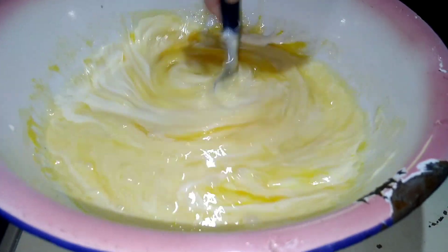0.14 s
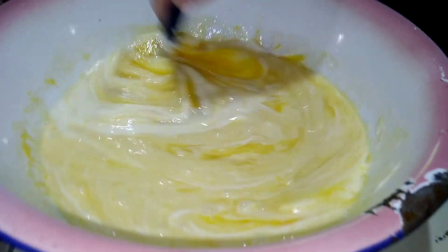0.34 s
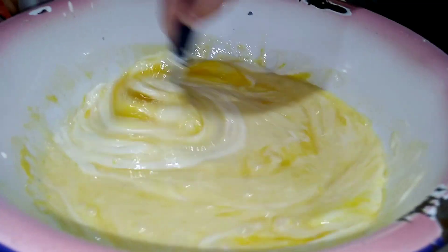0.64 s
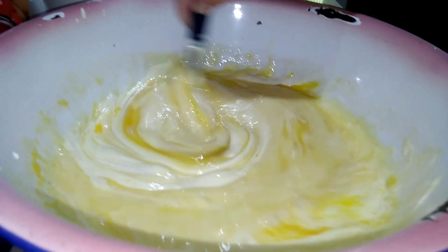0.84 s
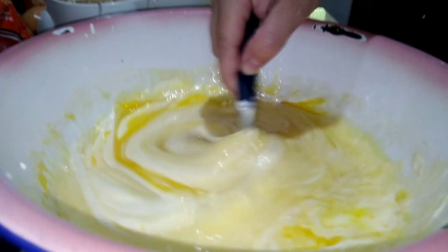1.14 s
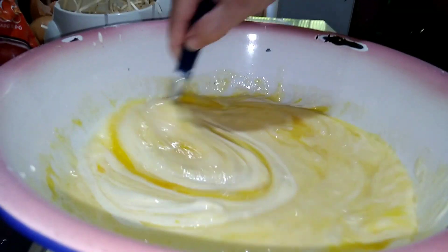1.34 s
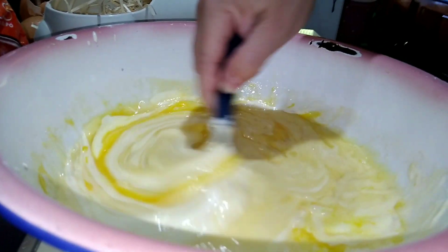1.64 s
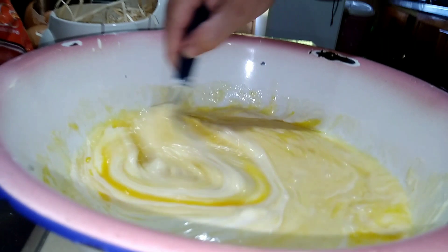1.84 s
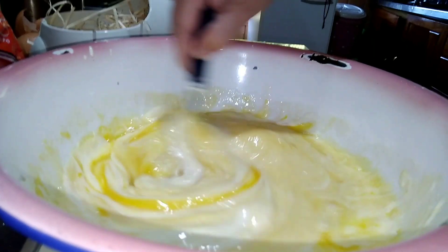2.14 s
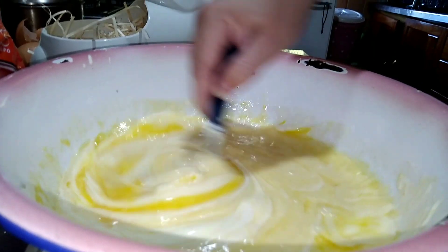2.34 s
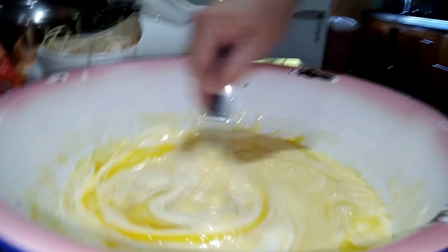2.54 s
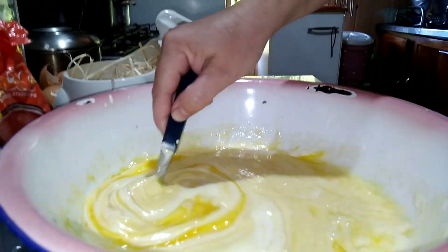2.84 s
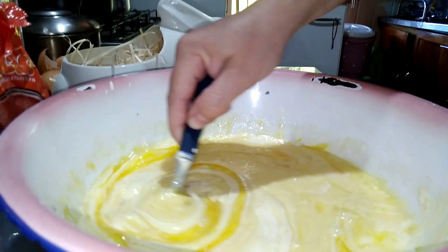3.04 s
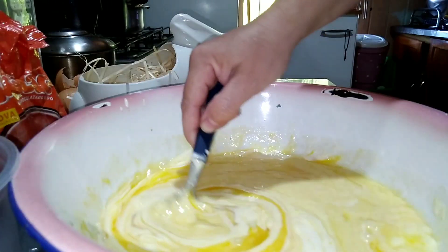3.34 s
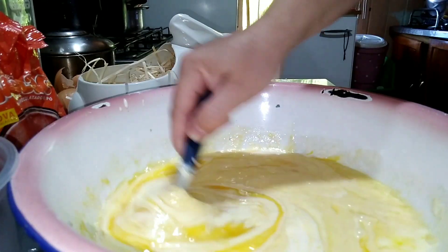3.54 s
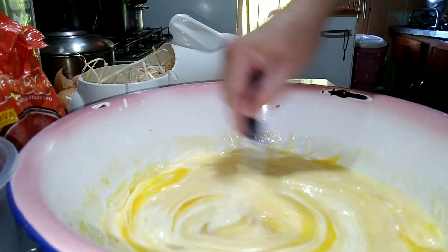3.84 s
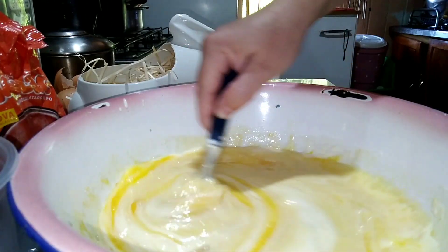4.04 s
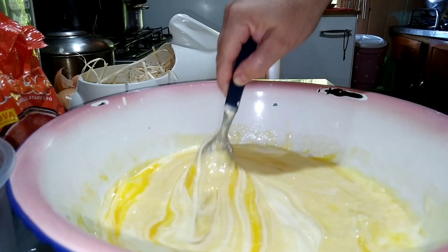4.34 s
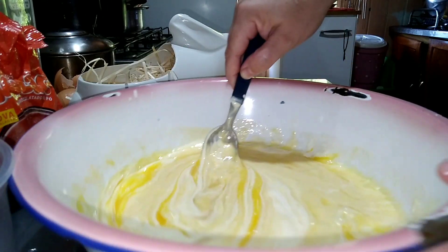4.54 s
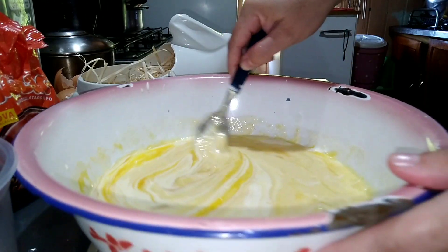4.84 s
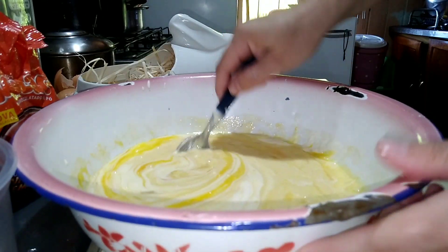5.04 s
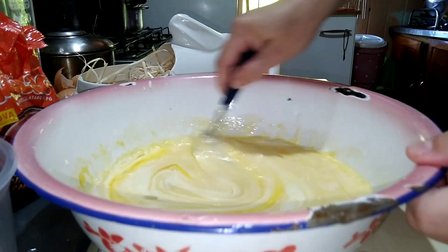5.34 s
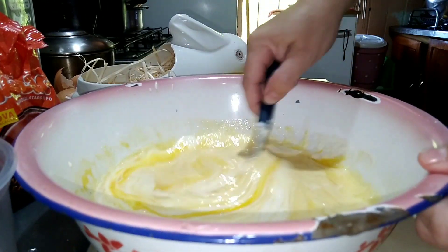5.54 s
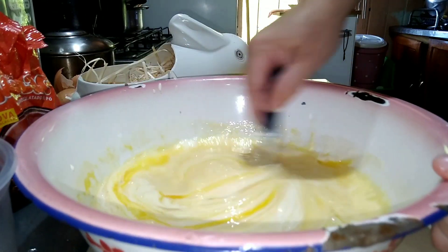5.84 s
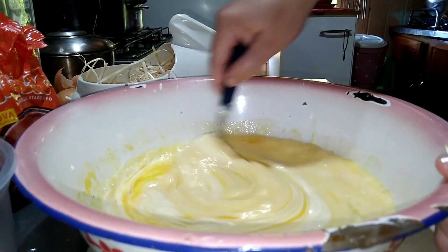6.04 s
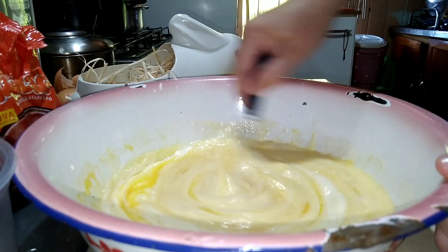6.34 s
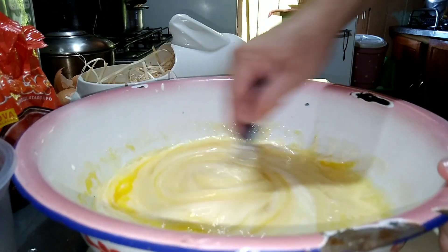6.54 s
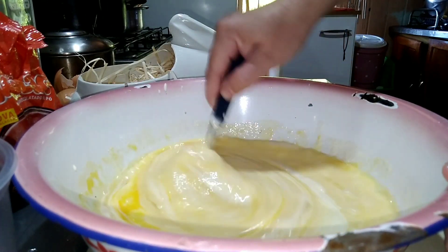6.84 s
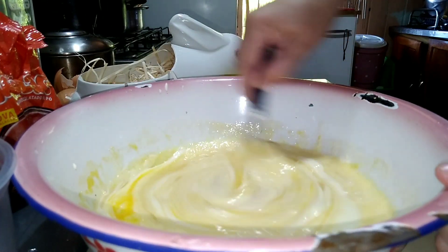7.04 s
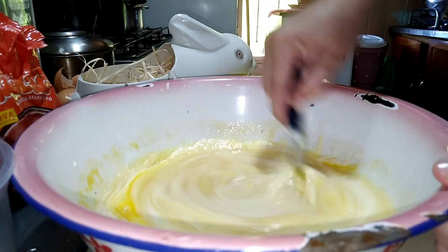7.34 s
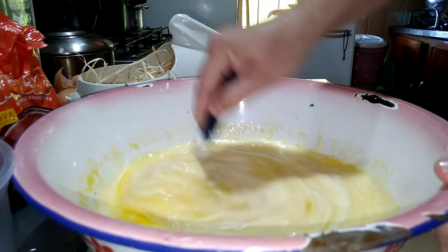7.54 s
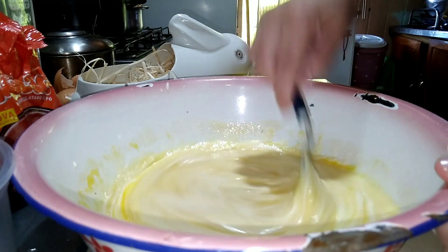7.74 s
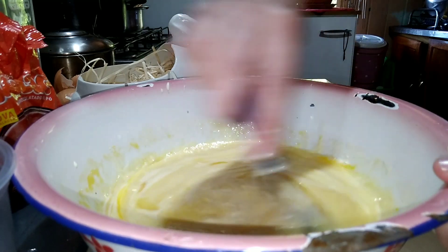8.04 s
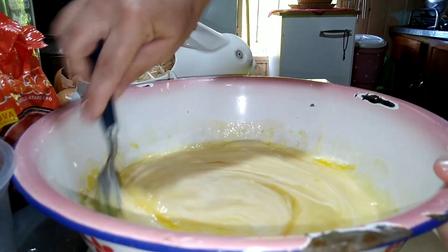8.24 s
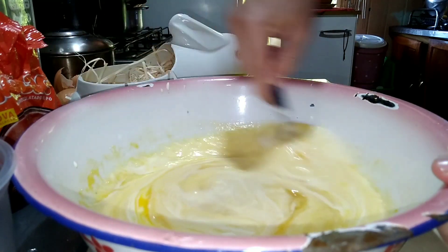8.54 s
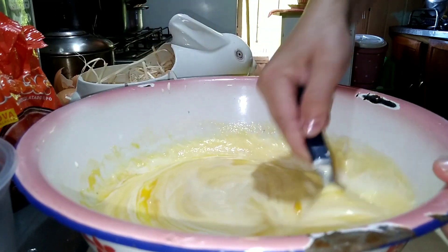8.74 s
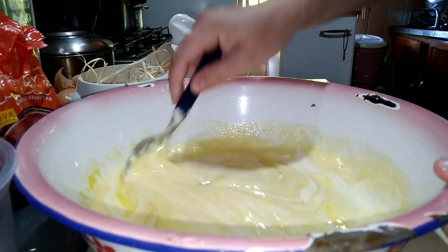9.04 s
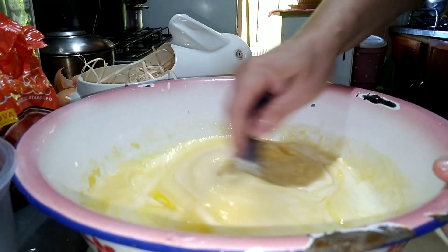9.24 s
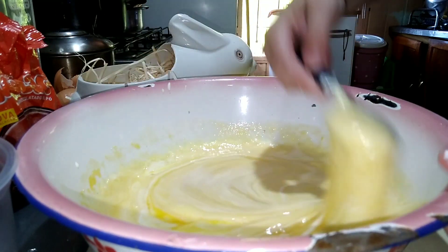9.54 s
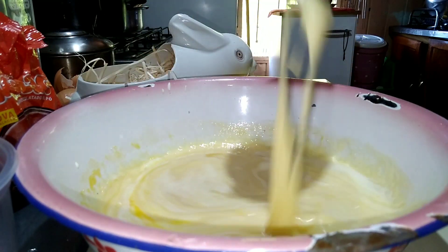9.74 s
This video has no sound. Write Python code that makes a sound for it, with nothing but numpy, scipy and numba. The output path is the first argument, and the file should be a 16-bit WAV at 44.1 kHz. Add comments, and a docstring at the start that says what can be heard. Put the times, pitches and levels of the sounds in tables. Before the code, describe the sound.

A metal spoon stirs thick wet batter in an enamel basin, scraping, squelching and knocking dully, over a low kitchen hum.

```python
"""A brief wet scrape comes first, then a spoon stirs thick batter in an enamel basin, heard by two microphones.
Each stroke drags wet grit over the enamel, built from tiny random slips, and pops small air pockets, built from
short notes. Knocks ring the batter-damped wall and boom the bottom, as fading sine waves and noise; early on,
firm blows on the bottom also rock the basin. Filtered noise makes the quiet kitchen: a low rumble and the hum
of an appliance."""
import sys
import numpy as np
from scipy import signal
from scipy.fft import rfft, irfft
from scipy.io import wavfile
from scipy.ndimage import uniform_filter1d
from numba import njit

SR = 44100
rng = np.random.default_rng(int(sys.argv[2]) if len(sys.argv) > 2 else 0)


def log_audio(samples):
    """Write samples as a 16-bit WAV file to the path given in sys.argv[1]."""
    # one column per channel
    frames = np.atleast_2d(samples).T
    # limit to full scale, then quantise
    limited = np.clip(frames, -1, 1)
    pcm = np.round(limited * 32767).astype(np.int16)
    wavfile.write(sys.argv[1], SR, pcm)


N = 435708
TIME = np.arange(N) / SR
OPPOSITE = np.array([[1], [-1]])  # added to the left, taken from the right


def undb(db):
    """Turn decibels into a gain."""
    return 10 ** (np.asarray(db) / 20)


def unit(x):
    """Scale to an average (rms) level of 1."""
    return x / np.sqrt(np.mean(x ** 2))


def early_level(x, count):
    """The rms level of the first samples of a sound."""
    return np.sqrt(np.mean(x[:, :count] ** 2))


def curve(rows):
    """Gain at every sample, drawn through rows of seconds and dB."""
    return undb(np.interp(TIME, *np.transpose(rows)))


def convolve(x, response):
    """Let x set off a response at every sample, keeping the length of x."""
    return signal.fftconvolve(np.atleast_2d(x), np.atleast_2d(response), axes=-1)[:, :x.shape[-1]]


def colour(x, points, size=4096):
    """Shape the tone through points of Hz and dB, without any sound before its cause."""
    hz, db = np.transpose(points)
    grid = np.linspace(1, SR / 2, size // 2 + 1)
    log_gain = np.log(undb(np.interp(np.log(grid), np.log(hz), db)))
    cepstrum = irfft(log_gain)
    # folding the cepstrum makes the filter respond as early as it can
    fold = 1 + np.sign(size // 2 - np.arange(size))
    fold[0] = 1
    return convolve(x, irfft(np.exp(rfft(cepstrum * fold))))


def band(x, lo_hz, hi_hz, order=2):
    """Keep the range between two frequencies."""
    edges = [lo_hz, min(hi_hz, SR / 2 - 1)]
    return signal.sosfilt(signal.butter(order, edges, "band", fs=SR, output="sos"), x)


def walk(rate):
    """Smooth random wander with a spread near 1, taking this many new values a second."""
    k = int(SR / rate)
    steps = np.repeat(rng.standard_normal(N // k + 1), k)
    return unit(uniform_filter1d(steps, k)[:N])


def fade(t, t60):
    """Exponential decay, 60 dB down after t60 seconds."""
    return np.exp(-np.log(1000) * t / t60)


def add(out, at, sound):
    """Mix a sound in at a time in seconds."""
    i = int(at * SR)
    out[:, i:i + sound.shape[-1]] += sound[..., :N - i]


def pair(count, apart_hz=700):
    """Noise as two close microphones hear it: alike in the bass, unrelated in the treble."""
    mid, side = rng.standard_normal((2, count))
    return mid + band(side, apart_hz, SR / 2, order=1) * OPPOSITE


@njit
def resonate(x, hz, damping):
    """Band-pass like a hollow whose pitch may move at every sample."""
    y, b, l = np.empty(len(x)), 0., 0.
    for i in range(len(x)):
        g = np.tan(np.pi * hz[i] / SR)
        v = (b + g * (x[i] - l)) / (1 + g * (g + damping))
        b, l, y[i] = 2 * v - b, l + 2 * g * v, v
    return y


ATTACK_S, RELEASE_T60_S = 0.019, 0.07  # the spoon bites at once; the batter stills quickly behind it


def sweep(start, length, swell_db=0):
    """Loudness of one push: quick attack, a steady, swelling or sagging middle, short release."""
    t = np.maximum(TIME - start, 0)
    along = np.minimum(t / length, 1) - .5
    hold = undb(swell_db * along)
    return np.minimum(t / ATTACK_S, 1) * hold * fade(np.maximum(t - length, 0), RELEASE_T60_S)


# Sweeps of the spoon through the batter.
# Each row: start in seconds, length in seconds, level halfway in dB, swell from start to end in dB.
SWEEPS = [(0, 0.06, -41.5, -18), (0.131, 0.36, -45.5, 3), (0.55, 0.31, -47, 3.5), (0.888, 0.398, -50, 2),
          (1.487, 0.3, -47.5, -3), (1.873, 0.26, -45, -5.5), (2.174, 0.58, -47.5, -7),
          (2.886, 0.28, -53.5, 15), (3.246, 0.15, -58, 16.5), (3.423, 0.47, -46, 3), (3.925, 0.24, -51, -1),
          (4.223, 0.71, -67.5, 10), (4.423, 0.33, -50, 4.5), (4.557, 0.22, -48.5, -23),
          (5.032, 0.23, -46.5, 0), (5.392, 0.45, -48, 5), (5.901, 1.09, -46, 2), (7.034, 0.61, -43, 7),
          (7.86, 0.84, -43.5, 1), (9.055, 0.28, -40.5, 4.5)]


def drag():
    """How hard the spoon drags through the batter; where sweeps overlap, the stronger one counts."""
    return np.max([undb(db) * sweep(start, length, swell) for start, length, db, swell in SWEEPS], axis=0)


# The filled basin and the spoon ring at these pitches, give or take a little.
# Each row: pitch in Hz, typical strength in dB, time to fade by 60 dB in seconds.
BASIN_MODES = [(140, 0, .17), (195, -2, .1), (372, -1, .11), (490, -2, .09), (660, -3, .08), (900, -3, .08),
               (1045, -3, .07), (1600, -7, .05), (1880, -5, .06), (2450, -10, .06)]


def ring(t, detune=0.025, spread_db=3, apart_hz=1100):
    """The basin's modes from one contact point; high modes reach the two microphones out of step."""
    hz, db, t60 = np.transpose(BASIN_MODES)[:, :, None]
    pitch, size, lag = rng.standard_normal((len(BASIN_MODES), 3)).T[:, :, None]
    phase = 2 * np.pi * hz * (1 + detune * pitch) * t
    skew = lag * np.minimum(hz / apart_hz, 2)
    fading = np.sign(lag) * undb(db + spread_db * size) * fade(t, t60)
    return np.array([np.sum(fading * np.sin(phase + side * skew), axis=0) for side in (1, -1)])


# The spoon's own metal modes. Each entry: pitch in Hz.
SPOON_MODES = [1970, 2400, 2930, 3850]


def spoon(t60):
    """The spoon's metal ring, with its own phase at each microphone."""
    t = np.arange(SR // 3) / SR
    return sum(np.sin(2 * np.pi * (hz * t + rng.random((2, 1)))) for hz in SPOON_MODES) * fade(t, t60)


# Tone of the wet scraping. Each row: frequency in Hz, strength in dB.
SCRAPE_TONE = [(120, -15), (350, 7.5), (1200, -5.5), (1900, -3), (3700, -12), (5500, -18.5), (7200, -27),
               (16000, -33)]
# The spoon skims fast over thinly coated enamel and hisses.
# Each row: time in seconds, level of the hiss in dB against the scraped grit.
SKIM_HISS = [(3.4, -18), (3.6, -9.5), (4.2, -21.5), (7.9, -14.5), (8.26, -11), (8.32, 2.5), (8.6, -5.5),
             (9.05, -9)]


def scraping(grains_per_s=4500, grain_db=1.0, ring_db=-6, smear_t60=0.0023, direct_db=-5,
             skim_hz=2650, spoon_t60=.015):
    """Tiny slips of the spoon crackle through the batter, make the wall sing and, at speed, hiss and ring the spoon."""
    chance, size, sign = rng.random(N), rng.exponential(size=N), rng.standard_normal(N)
    force = (chance < grains_per_s / SR) * undb(grain_db * np.minimum(size, 7))
    slips = force * np.sign(sign)
    t = np.arange(SR // 10) / SR
    # every slip scatters around the bowl by its own paths
    scatter = pair(N) * np.sqrt(np.abs(convolve(force ** 2, fade(t, smear_t60) ** 2)))
    direct = np.array([slips, slips * np.sign(rng.standard_normal(N))])
    grit = unit(scatter) + undb(direct_db) * unit(direct)
    wall = band(convolve(slips, ring(t, detune=0, spread_db=5)), 300, 6000)
    rush = unit(band(grit, skim_hz, 2 * skim_hz, order=1))
    spoon_ring = unit(convolve(slips, spoon(spoon_t60)))
    hiss = unit(rush + spoon_ring) * curve(SKIM_HISS)
    return unit(colour(grit, SCRAPE_TONE)) + undb(ring_db) * unit(wall) + hiss


def squelch(count=900, pocket_hz=1650, octaves=0.67, cycles=45, glide=0.087, size_db=4):
    """Air pockets open behind the spoon, each a short note that rises a little."""
    out, t = np.zeros((2, N)), np.arange(SR // 10) / SR
    for at, (pitch, size, lag) in zip(rng.uniform(0, N / SR, count), rng.standard_normal((count, 3))):
        hz = pocket_hz * 2 ** (octaves * pitch)
        life = cycles / hz  # seconds to fade by 60 dB
        phase = 2 * np.pi * hz * t * (1 + glide * np.minimum(t / life, 2) / 2)
        swell = fade(t, life) - fade(t, life / 10)
        add(out, at, undb(size_db * size) * swell * np.sin(phase + np.array([[lag], [-lag]])))
    return unit(out)


# The furrow behind the spoon is an air cavity.
# Each row: time in seconds, the pitch in Hz around which its upper resonance wanders.
FURROW_PITCH = [(7.85, 1680), (8.2, 2290), (8.6, 1783)]


def slosh(octaves=0.11, lower=0.54, damping=.12):
    """Batter closes unevenly over the furrow, whose two hollow resonances wander and gulp."""
    out, centre = 0, np.interp(TIME, *np.transpose(FURROW_PITCH))
    for ratio in (1, lower):
        hz = centre * ratio * 2 ** (octaves * walk(35))
        hollow = np.array([resonate(noise, hz, damping) for noise in pair(N)])
        out = out + unit(band(hollow, 400, 4200) * undb(2.3 * walk(30)))
    return unit(out)


def patchy(x, depth_db=3.5, span_hz=230, hold_s=.03):
    """Short-lived resonant patches come and go all over the spectrum as the batter folds."""
    hz, t, cells = signal.stft(x, SR, nperseg=512)
    field = rng.standard_normal(cells.shape[1:])
    for axis, width in enumerate((span_hz / hz[1], hold_s / t[1])):
        for _ in range(2):  # smooth twice, for soft-edged patches
            field = uniform_filter1d(field, int(width) + 1, axis=axis)
    # the fine treble fizz stays more even
    gain = undb(depth_db * unit(field) / (1 + hz[:, None] / (SR / 4)))
    return signal.istft(cells * gain, SR)[1][:, :N]


def bite(x, bite_db=3, per_s=12, grain_db=2, grains_per_s=150, from_hz=3500):
    """The spoon's edge finds bare enamel and loses it again, so the treble swells and crackles within a sweep."""
    treble = band(x, from_hz, SR / 2, order=1)
    return x - treble + treble * undb(bite_db * walk(per_s) + grain_db * walk(grains_per_s))


def smack(pocket_hz=1500, tear_t60=0.032, octaves=.3, damping=.45):
    """One wet click: a film tears and briefly rings the air pocket under it; rms 1 over its first 4 ms."""
    t = np.arange(SR // 20) / SR
    hz = np.full(len(t), pocket_hz * 2 ** (octaves * rng.standard_normal()))
    tear = pair(len(t)) * fade(t, tear_t60)
    pop = np.array([resonate(resonate(noise, hz, damping), hz, 2 * damping) for noise in tear])
    return pop / early_level(pop, SR // 250)


def crackle(per_s=42, cluster_db=5, size_db=4):
    """Smaller wet clicks come in uneven clusters as the batter folds."""
    out, busy = np.zeros((2, N)), undb(cluster_db * walk(20))
    for at in TIME[rng.random(N) < per_s / SR * busy / busy.mean()]:
        add(out, at, undb(size_db * min(rng.exponential(), 2)) * smack())
    return unit(out)


# A film of batter tears off the spoon with a wet click. Each row: time in seconds, level in dB.
FILM_TEARS = [(0.729, -40.5), (0.85, -42), (1.206, -36.5), (5.129, -31.5), (5.555, -38.5), (5.598, -37.5),
              (6.298, -35), (7.124, -30.5), (7.38, -35), (7.482, -31.5), (7.598, -31), (8.125, -32.5),
              (8.557, -28)]


def smacks():
    """The wet clicks that stand out of the stirring, each a film tearing."""
    out = np.zeros((2, N))
    for at, db in FILM_TEARS:
        add(out, at, undb(db) * smack())
    return out


# The furrow pinches into a narrow hollow that sings.
# Each row: start in seconds, length in seconds, first pitch in Hz, last pitch in Hz, level in dB.
HOLLOWS = [(7.909, 0.14, 620, 710, -38.5), (8.602, 0.088, 1780, 1580, -38.5)]


def gulps(width_hz=170):
    """A narrow hollow in the batter rings at a gliding pitch as it opens or closes."""
    out = 0
    for start, length, first_hz, last_hz, db in HOLLOWS:
        hz = np.interp(TIME, [start, start + length], [first_hz, last_hz])
        damping = width_hz / first_hz
        note = np.array([resonate(resonate(noise, hz, damping), hz, 2 * damping) for noise in pair(N)])
        out = out + undb(db) * unit(note) * sweep(start, length)
    return out


# The spoon meets the basin.
# Each row: time in seconds, wall ring in dB, bottom boom in dB, metal tick in dB.
SPOON_KNOCKS = [(0.228, -37.5, -42.5, -47.5), (0.337, -28.5, -37.5, -33.5), (0.627, -30, -38, -39),
                (0.971, -37, -46.5, -47.5), (1.008, -31, -43, -40), (1.056, -44.5, -28.5, -55),
                (1.694, -36.5, -51.5, -56), (1.819, -29.5, -31, -60.5), (1.931, -27.5, -32, -40.5),
                (2.26, -32, -40, -35.5), (2.353, -42, -35, -69), (2.49, -41.5, -29, -52),
                (2.544, -45, -30.5, -50.5), (2.751, -42, -41.5, -86), (3.062, -33.5, -25, -60),
                (3.104, -43.5, -31, -68), (3.132, -19.5, -19, -31.5), (3.152, -27.5, -27, -61),
                (3.653, -47, -40, -60), (3.987, -35, -50, -57), (4.039, -32, -34.5, -44),
                (4.215, -55, -36.5, -86), (4.559, -25, -29, -36.5), (4.572, -23.5, -31, -46),
                (4.593, -29.5, -30, -69), (4.643, -48.5, -35.5, -73), (4.699, -35.5, -34.5, -54),
                (5.028, -30, -32.5, -51.5), (5.364, -40.5, -40, -68.5), (5.446, -36.5, -34.5, -43.5),
                (5.76, -29.5, -34.5, -36), (6.037, -35.5, -24, -49), (6.106, -31.5, -39, -39.5),
                (6.464, -29.5, -39.5, -37), (6.538, -43.5, -37, -46.5), (6.817, -30, -35.5, -36),
                (7.056, -30.5, -26.5, -49), (7.147, -25.5, -30, -37.5), (7.206, -30, -35.5, -43.5),
                (7.552, -47, -34.5, -40.5), (7.857, -33.5, -24, -53.5), (8.007, -31.5, -27, -45),
                (8.408, -36, -41.5, -47.5), (8.587, -32.5, -31.5, -39.5), (9.045, -37.5, -34, -51.5),
                (9.093, -24.5, -33, -32.5), (9.281, -24, -25, -32), (9.305, -36, -41.5, -43)]
# The soft knock as a sweep touches down, against the level of that sweep.
# The entries: wall ring in dB, bottom boom in dB, metal tick in dB.
SOFT_LANDING = (0, -5, -21)


def blows():
    """The clear knocks, and the soft landing that opens every sweep but the first."""
    landings = [(start, *np.add(SOFT_LANDING, db)) for start, _, db, _ in SWEEPS[1:]]
    return [*SPOON_KNOCKS, *landings]


# Tone of the dense, quickly damped vibration of a blow. Each row: frequency in Hz, strength in dB.
CRACK_TONE = [(100, 5), (300, 8), (1000, -3.5), (2200, 5.5), (4000, -9.5), (7000, -20.5), (16000, -35.5)]
FIRM_DB, FIRM_CLEAN = -23, .82  # a blow this strong lands clean: it loses this share of its skid and chatter
PRESS_T60_S = 0.8  # the spoon stays pressed on the wall and damps the ring, sooner when the blow is firm


def knocks(crack_t60=0.088, crack_db=2, snap_db=12, snap_t60=0.0053, chatter_db=-13, chatter_s=0.02,
           skid_s=.008, wall_hz=285):
    """The spoon skids, bites and chatters; bottom, wall and metal each answer with their own strength."""
    out, t = np.zeros((2, N)), np.arange(SR // 4) / SR
    early = SR // 20  # levels hold for the first 50 ms
    for at, wall_db, boom_db, tick_db in blows():
        # a glancing blow on the wall skids before it bites; a blow on the bottom lands almost at once
        loose = 1 - FIRM_CLEAN * min(undb(wall_db - FIRM_DB), 1)
        skid = loose * skid_s / (1 + undb(2 * (boom_db - wall_db)))
        slips = rng.standard_normal(len(t)) * (rng.random(len(t)) < 1 / 10)
        push = loose * undb(chatter_db) * slips * np.exp(-np.abs(t - skid) / (chatter_s + skid))
        push[int(skid * SR)] += 1  # the bite itself
        burst = fade(t, crack_t60) + undb(snap_db) * fade(t, snap_t60)
        dense = colour(pair(len(t)) * burst, CRACK_TONE)
        body = convolve(unit(ring(t)) + undb(crack_db) * unit(dense), push)
        # the bottom swings as one piston at the lowest mode, so both microphones hear the same boom
        boom_hz, _, boom_t60 = BASIN_MODES[0]
        piston = np.sin(2 * np.pi * boom_hz * t) * fade(t, boom_t60)
        muddle = band(body[:1], 150, 280)
        boom = unit(piston) + unit(muddle)
        # batter cushions a blow with little tick; bare enamel rings the higher wall modes
        bare = min(undb((tick_db - wall_db) / 2), 1)
        wall = band(body, wall_hz * (1 + bare ** 2 / 2), 2 * wall_hz * (1 + 2 * bare), order=3)
        tick = band(body, 1400, SR / 2)
        wall, tick = np.array([wall, tick]) * fade(t, PRESS_T60_S * loose)
        for part, db in ((boom, boom_db), (wall, wall_db), (tick, tick_db)):
            add(out, at - skid, part * undb(db) / early_level(part, early))
    return out


def clicks(click_db=-2, click_t60=0.0045, lo_hz=2500, hi_hz=9000, most_db=-36):
    """The instant at which bare metal meets enamel; above a limit, a harder blow adds no more click."""
    out, t = np.zeros((2, N)), np.arange(SR // 20) / SR
    for at, _, _, tick_db in SPOON_KNOCKS:
        noise = unit(band(pair(len(t)), lo_hz, hi_hz, order=1))
        add(out, at, undb(min(tick_db, most_db) + click_db) * noise * fade(t, click_t60))
    return out


# After one hard blow the spoon rattles clear of the batter and rings on.
# The entries: time in seconds, level in dB.
SPOON_RATTLE = (4.562, -36)


def jangle(ring_t60=0.034, rattle_t60=0.21):
    """The spoon rattles down the wall in ever weaker ticks that keep its metal ringing."""
    out, t = np.zeros((2, N)), np.arange(SR // 3) / SR
    at, db = SPOON_RATTLE
    ticks = (rng.random(len(t)) < 1 / 20) * rng.standard_normal(len(t)) * fade(t, rattle_t60)
    note = convolve(ticks, spoon(ring_t60))
    add(out, at, note * undb(db) / early_level(note, SR // 20))
    return out


# from this time on a hand steadies the basin (s); before it, a boom above this level can rock it (dB)
HELD_S, ROCK_FROM_DB = 4.4, -33.5


def rocking(rock_hz=68, rock_t60=0.14, over_boom_db=10.0):
    """Until a hand steadies it, a firm blow on the bottom bounces the basin on its support, slower as it settles."""
    out, t = np.zeros((2, N)), np.arange(SR // 3) / SR
    thud = np.sin(2 * np.pi * rock_hz * t / (1 + 2 * t)) * fade(t, rock_t60)
    for at, wall_db, boom_db, _ in SPOON_KNOCKS:
        # the boom must also not be far below the wall ring
        if at < HELD_S and boom_db > max(wall_db - 3, ROCK_FROM_DB):
            add(out, at, undb(boom_db + over_boom_db) * thud)
    return out


# Tone of the kitchen rumble. Each row: frequency in Hz, strength in dB.
RUMBLE_TONE = [(20, 1.5), (70, 0), (100, -14), (130, -8.5), (200, -11), (400, -23), (800, -31),
               (1400, -58.5), (16000, -69.5)]
# The appliance hum. Each row: time in seconds, level in dB.
HUM_LEVEL = [(0, -46.5), (5.7, -40.5), (6.1, -38.5), (7.7, -39.5), (8.1, -44.5)]


def kitchen(rumble_db=-44.0, side_db=-6):
    """Low rumble and the unsteady drone of an appliance, both filtered noise."""
    mid, side = colour(rng.standard_normal((2, N)), RUMBLE_TONE)
    rumble = unit(mid) + undb(side_db) * unit(side) * OPPOSITE
    hum = unit(band(rng.standard_normal(N), 40, 72))
    return undb(rumble_db) * rumble + curve(HUM_LEVEL) * hum


def scene(scrape_db=-2.0, squelch_db=-8.0, slosh_db=-7.5, crackle_db=-3, plop_db=-6.5):
    """Scraping, crackle, pockets, plops and slosh follow the drag of the spoon; the other sounds join on top."""
    plops = squelch(count=260, pocket_hz=620, cycles=30)  # fewer, deeper air pockets
    batter = undb(squelch_db) * squelch() + undb(plop_db) * plops + undb(slosh_db) * slosh()
    stirring = patchy(undb(scrape_db) * scraping() + batter)
    stirring = stirring + undb(crackle_db) * crackle()
    basin = knocks() + clicks() + jangle() + rocking()
    return drag() * bite(stirring) + smacks() + gulps() + basin + kitchen()


# The right microphone faces away and is shaded.
# Each row: frequency in Hz, strength in dB against the left.
RIGHT_SHADE = [(60, -2), (140, 3), (350, 0), (1400, 1), (5000, -7.5), (8000, -17)]
TOP_HZ = 15900


def record(dry):
    """The right microphone is duller; both clip at full scale and lose the very top of the treble."""
    ports = np.vstack([dry[:1], colour(dry[1:], RIGHT_SHADE)])
    top_cut = signal.ellip(8, .2, 70, TOP_HZ, fs=SR, output="sos")
    return signal.sosfilt(top_cut, np.clip(ports, -1, 1))


dry = scene()
out = record(dry)
log_audio(out)
```